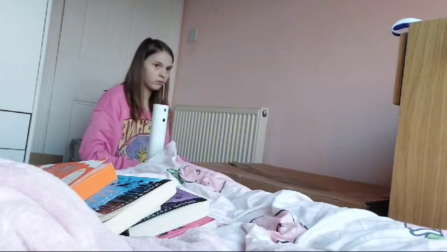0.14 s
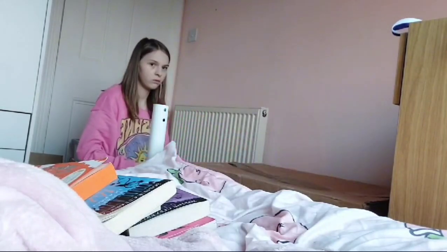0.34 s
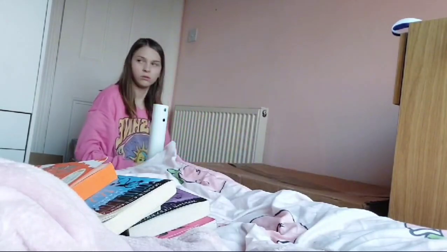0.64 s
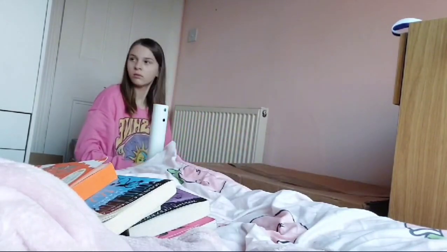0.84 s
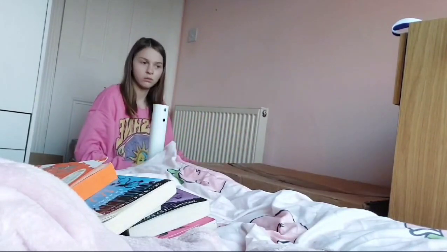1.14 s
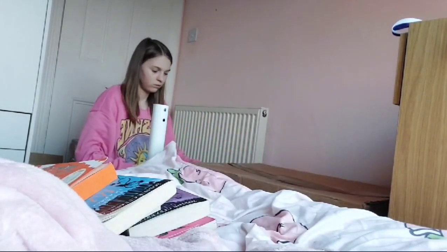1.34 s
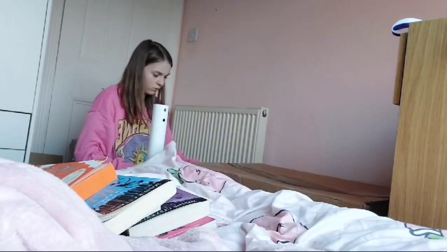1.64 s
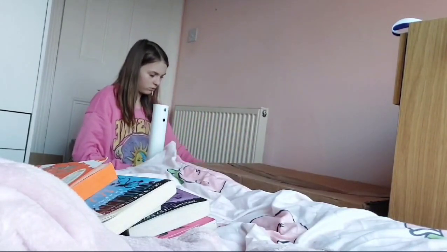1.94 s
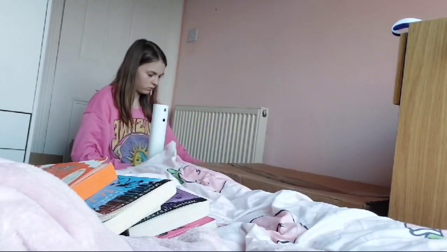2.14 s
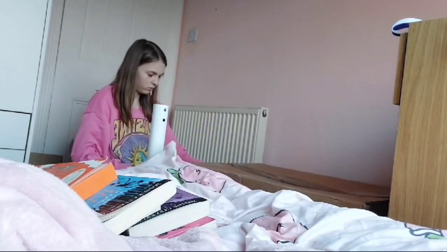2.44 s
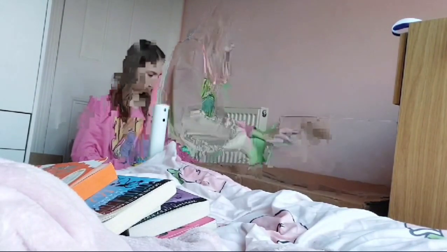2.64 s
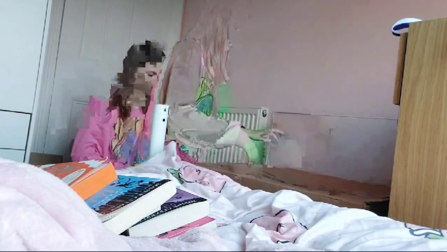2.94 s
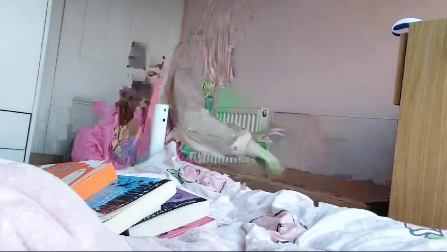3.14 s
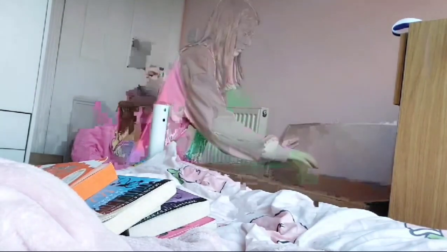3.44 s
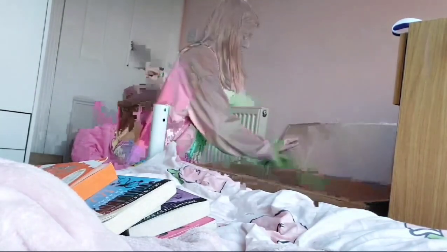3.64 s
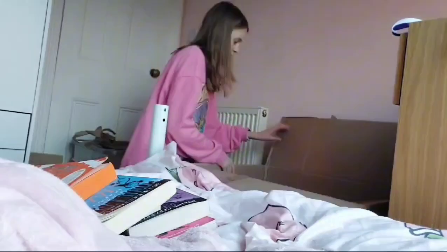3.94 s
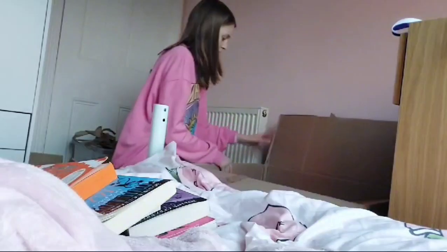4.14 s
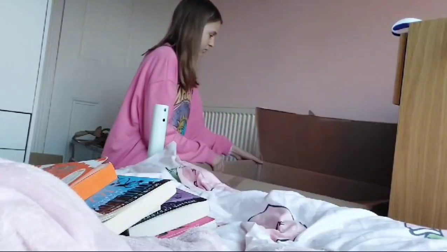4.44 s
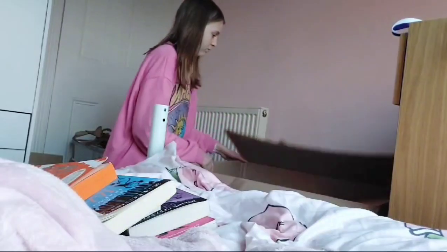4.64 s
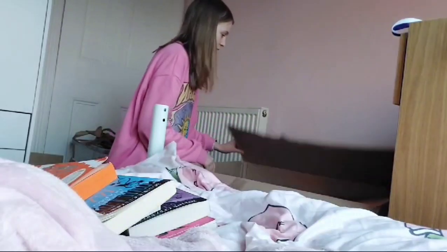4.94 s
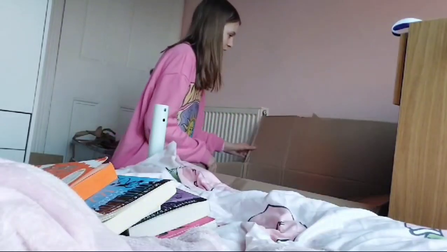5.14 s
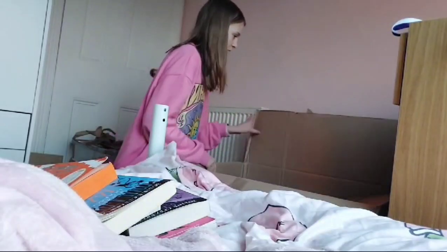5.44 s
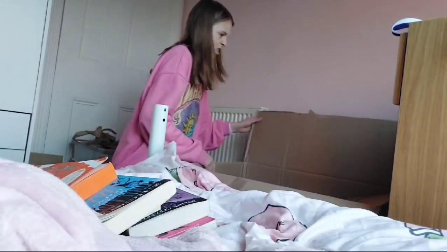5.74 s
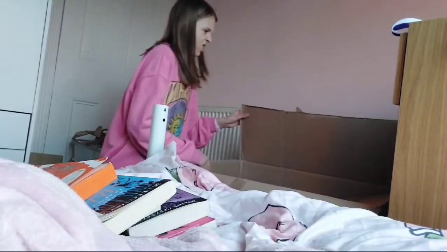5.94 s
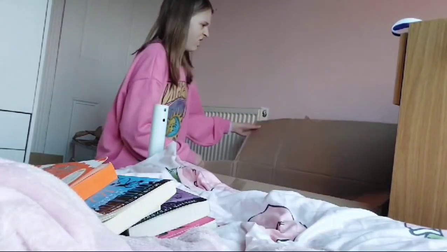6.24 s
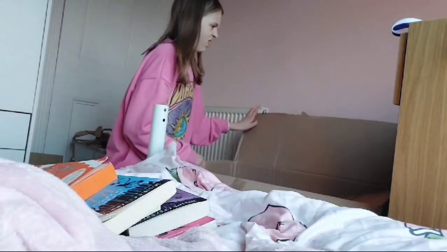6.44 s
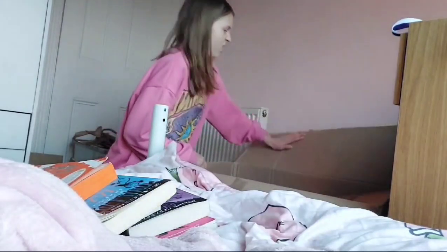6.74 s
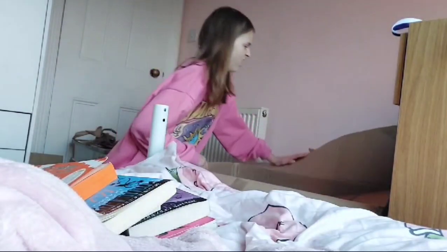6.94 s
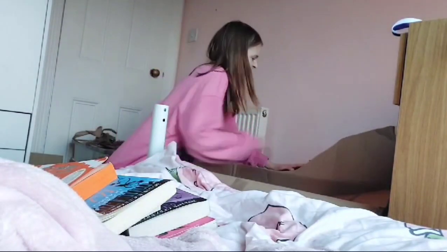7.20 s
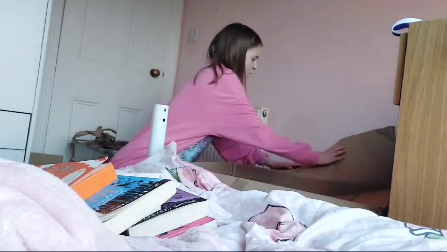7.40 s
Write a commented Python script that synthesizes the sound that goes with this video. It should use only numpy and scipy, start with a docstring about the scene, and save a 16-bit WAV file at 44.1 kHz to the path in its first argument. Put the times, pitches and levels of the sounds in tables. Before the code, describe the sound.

Close, bright paper tearing and crumpling for two seconds, a hard cut, then cardboard rubbing, rustling and dull boomy thumps in a small bedroom.

```python
"""Packing paper is ripped and crinkled at a large cardboard box in a small bedroom, with three early knocks.
At a hard cut the ripping gives way to sheets sliding over the cardboard, and soon to many knocks on its flap.
Snapping fibres are random clicks, filtered into crackle and the hollow rasp and rumble of the box;
scrapes are gliding noise bands, knocks are fading flap modes with clatter, all heard over a quiet room.
The loudest peaks flatten as they overload the microphone."""
import sys
import numpy as np
from scipy import signal
from scipy.fft import rfft, irfft, next_fast_len
from scipy.io import wavfile

SR = 44100
rng = np.random.default_rng(int(sys.argv[2]) if len(sys.argv) > 2 else 0)


def wav_out(sig):
    """Save sig, one row per channel (or a flat mono array), as 16-bit PCM at SR to the path in sys.argv[1]."""
    wavfile.write(sys.argv[1], SR, np.round(np.clip(np.atleast_2d(sig).T, -1, 1) * 32767).astype(np.int16))


N = 333837
TIME = np.arange(N) / SR
PADDED = next_fast_len(N + SR // 2)  # FFT length that leaves room for the echoes
STFT_SIZE = 512  # samples
CUT_S = 2.109  # ripping before, sliding after

# A crease or strip gives way; relative levels: [t/s, crack level/dB, jolt of the box wall/dB]
SNAPS = [(0.15, -18, -36), (0.2217, -19, -14.5), (0.268, -7, -22.5), (0.4593, -12, -18), (0.5186, -12, -13),
         (0.5686, -5, -10), (0.7606, 0.5, -4), (0.9524, -15, -28), (1.0059, 5, -8), (1.1148, -8, -4),
         (1.1912, -8, -8.5), (1.2268, -19, -15.5), (1.4651, -10.5, -46), (2.0262, -1.5, -14),
         (2.0951, -1, -11), (2.3745, -20, -27), (3.8142, -28, -33), (4.274, -22, 0), (4.8589, -30, -21),
         (5.6022, -15, -24), (5.7005, -12, -31), (6.2314, -15, -12), (6.316, -24, -24), (6.4121, -21, -40),
         (6.49, -21, -1), (6.9251, -12, -27), (6.99, -6.5, -6), (7.0202, -9.5, -25)]
# The cardboard is knocked; relative levels, nominal flap pitch:
# [t/s, boom level/dB, flap pitch f/Hz, clatter level/dB]
KNOCKS = [(0.281, -14, 111, -16.5), (0.318, -14, 125.6, -28), (0.363, -13.5, 140.5, -18),
          (2.478, -11.5, 117.5, -37.5), (3.012, -23, 131, -34), (3.302, -13, 182.6, -15.5),
          (3.317, -2.5, 144, -24), (3.345, -4.5, 145.1, -24), (3.389, -7.5, 140, -31),
          (4.104, -12, 134.5, -21), (4.159, -11.5, 140.2, -23.5), (4.276, -1, 148, -9),
          (4.626, -23, 173, -16.5), (4.703, -18.5, 115.7, -41), (4.983, -12, 134, -41),
          (5.087, -22, 185, -14.5), (5.119, 4, 127.8, -11), (5.566, -7, 138.4, -15.5),
          (5.612, -14, 146.3, -9), (5.662, -29, 143, -14.5), (5.755, -22, 138.3, -13),
          (5.892, -16, 153, -16.5), (6.007, -2.5, 112.2, -8.5), (6.178, -8.5, 109.2, -11.5),
          (6.421, -12.5, 188, -25.5), (6.587, -2, 123.7, -22.5), (6.649, -5.5, 149, -12.5),
          (6.914, -5, 128.5, -22), (7.396, 5, 132, -10.5), (7.422, -5, 117.6, -12)]
# An edge catches and scrapes, narrow bands squeak; start pitch, nominal width:
# [t/s, length/s, pitch f/Hz, width/Hz, level/dB]
SCRAPES = [(0.105, 0.021, 705, 159, -20), (0.087, 0.053, 1494, 500, -29), (0.215, 0.06, 573, 91, -12),
           (0.222, 0.061, 1450, 1100, -24.5), (0.439, 0.061, 8550, 1000, -26.5),
           (0.496, 0.022, 5190, 200, -15.5), (0.517, 0.063, 562, 120, -14.5), (1.113, 0.035, 586, 220, -21),
           (1.193, 0.072, 3730, 520, -16), (2.089, 0.019, 867, 355, -13), (2.249, 0.067, 900, 600, -24.5),
           (2.996, 0.072, 596, 260, -39), (3.297, 0.05, 470, 244, -22.5), (5.09, 0.048, 1096, 1200, -29.5),
           (5.598, 0.0066, 7900, 500, -14), (5.922, 0.1, 1916, 1700, -24.5), (5.992, 0.11, 1296, 990, -24)]


def ripping(spots, box_edge):
    """Brittle fracture: pulls on the paper break fibres in avalanches, with stick-slip at the box edge."""
    # Pulls that tear and crumple; relative levels:
    # [t/s, rise/s, fade/s, crackle level/dB, wall rasp level/dB, box rumble level/dB]
    pulls = [(0.0, 0.0013, .08, -22.5, -32, -24), (0.1, 0.0052, 0.48, -37, -28.5, -29),
             (0.2, 0.015, 0.094, -21.5, -13, -35), (0.225, 0.024, 0.16, -20.5, -33, -24),
             (0.445, 0.11, 0.047, -20, -49, -19), (0.512, 0.0073, 0.075, -12.5, -9, -42),
             (0.535, 0.061, 0.22, -10.5, -20.5, -27), (0.755, 0.0092, .17, -16.5, -21.5, -27.5),
             (0.942, 0.0083, 0.13, -21, -30.5, -24), (1.0, 0.03, .14, -14.5, -18, -19),
             (1.106, 0.012, 0.13, -13.5, -19, -25), (1.175, 0.039, 0.089, -12, -16.5, -18),
             (1.33, 0.21, 0.14, -28, -33, -39), (1.53, 0.056, 0.052, -15.5, -23, -24),
             (1.69, 0.047, 0.11, -39, -40.5, -39.5), (1.826, 0.016, 0.16, -36.5, -43, -39),
             (1.917, 0.15, 0.37, -16.5, -21, -28.5)]
    # Relative spectrum of the tearing fibres: [f/Hz, level/dB]
    crackle_spectrum = [(590, -33), (1000, -3.5), (1400, 0), (1700, 1.5), (1840, -2), (2040, 0.5),
                        (3020, -5.5), (3580, -1), (3880, -4), (5180, -0.5), (6010, -5), (7650, -2),
                        (9090, -11.5), (12000, -1), (15600, -7.5)]
    # Relative spectrum of the box wall shaken by the pulls: [f/Hz, level/dB]
    wall_spectrum = [(140, -38), (240, -1), (352, -3), (392, -7.5), (509, 3), (703, -7.5), (763, -2),
                     (1150, -11), (1500, -45), (2530, -120)]
    fibres = grains(per_s=4000, spread_db=1.0, clump_db=2.5, clumps_per_s=260)
    fibres += creases(db=-7.5, per_s=63)
    snaps = [row for row in SNAPS if row[0] < CUT_S]
    torn = paper(effort(pulls, swell=1.14), snaps, crackle_spectrum, wall_spectrum, fibres, spots,
                 crackle_db=0.14, rasp_db=-1, rumble_db=-3.0, crack_db=-11.0, jolt_db=-1.5)
    edges = scrapes([row for row in SCRAPES if row[0] < CUT_S])
    return torn + bedroom(edges, box_edge)


def sliding(spots, box_edge):
    """Dry friction: sheets pushed over cardboard excite dense small impacts, with stick-slip at the box edge."""
    # Sheets pushed over the cardboard; relative levels:
    # [t/s, rise/s, fade/s, crackle level/dB, wall rasp level/dB, box rumble level/dB]
    slides = [(2.07, 0.2, 0.32, -33.5, -34.5, -44.5), (2.215, 0.11, 0.18, -37, -22, -33),
              (2.46, 0.038, 0.097, -32, -19, -44), (2.53, 0.053, 0.2, -33.5, -31.5, -36.5),
              (3.17, 0.17, 0.12, -42, -37, -35), (3.56, 0.41, 0.3, -49, -50, -45),
              (3.8, 0.22, 0.17, -29.5, -24.5, -28), (4.1, 0.14, 0.37, -36.5, -27, -25),
              (4.255, 0.022, 0.36, -28.5, -25, -43), (4.33, 0.35, .23, -29.5, -22.5, -24),
              (4.7, 0.083, 0.029, -31, -27, -33), (4.963, 0.0062, 0.19, -39.5, -32, -34),
              (5.03, 0.085, 0.15, -33, -22.5, -17.5), (5.335, 0.11, 0.45, -36, -30, -29),
              (5.52, 0.053, 0.27, -29, -25, -16), (5.735, 0.08, 0.39, -33, -26, -39),
              (5.9, 0.09, 0.37, -32.5, -23, -23.5), (6.175, 0.022, 0.34, -31.5, -27.5, -33),
              (6.35, 0.16, 0.11, -32, -27.5, -22), (6.48, 0.027, 0.14, -21.5, -19, -25),
              (6.54, 0.049, 0.2, -22.5, -19, -16), (6.68, 0.091, 0.31, -29.5, -19.5, -26.5),
              (6.82, 0.12, 0.16, -19, -12.5, -19.5), (6.98, 0.049, 0.24, -19.5, -12.5, -23),
              (7.275, 0.025, .19, -33, -25, -35.5), (7.46, 0.08, 0.17, -28.5, -15.5, -23.5)]
    # Relative spectrum of the rubbing sheets: [f/Hz, level/dB]
    crackle_spectrum = [(590, -23.5), (1000, -1.5), (1270, -5), (1330, -1.5), (1900, -2), (2950, -7.5),
                        (3540, -5), (4070, -7), (4780, -5), (6670, -8), (7230, -4), (7740, -8),
                        (8990, -15.5), (12000, -7), (15600, -14.5)]
    # Relative spectrum of the box wall shaken by the sheets: [f/Hz, level/dB]
    wall_spectrum = [(160, -35), (240, -4.5), (300, -5.5), (370, -3), (440, -3.5), (520, -5), (620, -3.5),
                     (780, -10), (1000, -15), (1400, -21.5), (2200, -89)]
    fibres = grains(per_s=7000, spread_db=4.0, clump_db=1.26, clumps_per_s=330)
    fibres += creases(db=-12, per_s=35)
    snaps = [row for row in SNAPS if row[0] > CUT_S]
    strength = effort([*slides, *shifts()], swell=1.16)
    rubbed = paper(strength, snaps, crackle_spectrum, wall_spectrum, fibres, spots,
                   crackle_db=2.5, rasp_db=-2, rumble_db=3.5, crack_db=-5.0, jolt_db=-12)
    edges = scrapes([row for row in SCRAPES if row[0] > CUT_S])
    return rubbed + bedroom(edges, box_edge)


def paper(strength, snaps, spectrum, wall, fibres, spots, crackle_db, rasp_db, rumble_db, crack_db, jolt_db):
    """Source and resonator: fibres snap under the stroke, which also shakes the box wall and the whole box."""
    # Relative spectrum of the whole box: [f/Hz, level/dB]
    box_spectrum = [(20, -51), (35, -22.5), (50, -16), (68, 0), (88, -7.5), (125, -1), (146, -1.5),
                    (180, -13), (235, -2), (280, -15), (380, -32.5), (620, -86)]
    snap_s = 0.011  # decay time constant of a snap
    crackle, rasp, rumble = strength
    wall_grains = grains(per_s=1200, spread_db=1.5, clump_db=0.5, clumps_per_s=61)
    box_grains = grains(per_s=900, spread_db=0.95, clump_db=3.3, clumps_per_s=69)
    crackle = amp(crackle_db) * crackle * fibres
    rasp = amp(rasp_db) * rasp * wall_grains
    rumble = amp(rumble_db) * rumble * box_grains
    for start_s, db, wall_db in snaps:
        add(crackle, start_s, amp(db + crack_db) * flurry(snap_s, edge=0.99))
        add(rasp, start_s, amp(wall_db + jolt_db) * flurry(snap_s, edge=0.43))
    crackle_heard = colour(bedroom(crackle, spots), spectrum)
    rasp_heard = colour(bedroom(rasp, spots), wall)
    return crackle_heard + rasp_heard + colour(rumble, box_spectrum)


def effort(strokes, swell):
    """Power addition: strokes swell and fade, and overlapping ones add as power in crackle, rasp and rumble."""
    fade_db, fade_curve = -23, 1.18  # level after one fade time, and the bend of that fall
    power, t = np.zeros((3, N)), TIME[:SR]
    for start_s, rise_s, fade_s, *levels in strokes:
        # the higher the swell, the softer the onset
        rise = np.sin(np.pi / 2 * np.minimum(t / max(rise_s, 1e-3), 1)) ** swell
        fade_times = np.maximum(t - rise_s, 0) / max(fade_s, 1e-2)
        shape = rise * amp(fade_db * fade_times ** fade_curve)
        for layer, db in zip(power, levels):
            add(layer, start_s, (amp(db) * shape) ** 2)
    return np.sqrt(power)


def shifts():
    """Impact sets friction going: each knock starts a short rubbing stroke of the loose sheets."""
    rise_s, fade_s = 0.0074, 0.067
    crackle_db, rasp_db, rumble_db = -27.5, -7.5, -10  # relative to the knock's clatter
    return [(start_s, rise_s, fade_s, db + crackle_db, db + rasp_db, db + rumble_db)
            for start_s, _, _, db in KNOCKS]


def creases(db, per_s):
    """Sparse buckling: single creases pop out above the fine crackle."""
    return amp(db) * grains(per_s=per_s, spread_db=1.5, clump_db=0.5, clumps_per_s=30)


def grains(per_s, spread_db, clump_db, clumps_per_s):
    """Random point process: clicks of uneven size and sign, whose level wanders so that they clump."""
    size = amp(spread_db * np.minimum(rng.exponential(1, N), 4)) * rng.choice([-1, 1], N)
    struck = rng.random(N) < per_s / SR
    return evened(size * struck * amp(clump_db * drift(clumps_per_s)))


def flurry(decay_s, edge=0, edge_s=0.00056, size=12000):
    """Exponential decay: a burst of tiny impacts dies away; edge adds the sharp first break."""
    t = np.arange(size) / SR
    envelope = np.exp(-t / max(decay_s, 1e-3)) + edge * np.exp(-t / edge_s)
    return rng.choice([-1, 1], size) * envelope


def scrapes(rows):
    """Stick-slip: uneven slips modulate a carrier, a band of chatter that sags as the edge slows."""
    sag = 0.91  # end pitch over start pitch
    out = np.zeros(N)
    for start_s, length_s, hz, width_hz, db in rows:
        size = int(length_s * SR)
        noise = [1, 1j] @ rng.standard_normal((2, SR // 2))
        lowpass = signal.bessel(2, width_hz * 0.59, fs=SR, output="sos")
        slips = signal.sosfilt(lowpass, noise)[-size:]  # past the filter's onset
        carrier = np.exp(2j * np.pi * np.cumsum(np.geomspace(hz, hz * sag, size)) / SR)
        chatter = evened((slips * carrier).real)
        add(out, start_s, amp(db) * chatter * signal.windows.tukey(size, .6))
    return out


def knocks(spots):
    """Modal excitation: a knock swings the flap's low modes, heaves the box and rattles loose cardboard."""
    # Modes of the flap, relative levels: [multiple of its pitch, level/dB]
    flap_modes = [(0.83, -7), (1, 4.5), (1.76, -8), (2.2, -19)]
    # Relative spectrum of the rattling layers: [f/Hz, level/dB]
    clatter_spectrum = [(60, -34.5), (150, -1), (240, 1), (320, -1), (400, -6), (520, -7), (650, -13),
                        (850, -26.5), (1500, -28.5), (4000, -65)]
    boom_db, heave_db, clatter_db, ring_db = -9.5, -16, 2, -14
    heave_hz = 66.8  # lowest mode of the whole box, before its random rise of up to 5 %
    rise_s, hold, clatter_decay = 0.0017, 1.44, 0.63
    knock_s, shortening = 0.022, 0.12  # decay scale of a 0 dB knock; harder knocks die away sooner
    boom, clatter, t = np.zeros(N), np.zeros(N), TIME[:SR // 2]
    for start_s, db, hz, rattle_db in KNOCKS:
        decay_s = knock_s / amp(db) ** shortening
        swing = np.zeros(len(t))
        for k, (ratio, mode_db) in enumerate(flap_modes):
            mode_hz = hz * ratio * rng.uniform(0.92, 1.02)
            swing += (-1) ** k * amp(mode_db) * np.sin(2 * np.pi * mode_hz * t)
        heave = np.sin(2 * np.pi * heave_hz * rng.uniform(1.0, 1.05) * t)
        # the swing holds at first, then dies away ever faster
        fade = (1 - np.exp(-t / rise_s)) * np.exp(-(t / max(2 * decay_s, 1e-3)) ** hold)
        add(boom, start_s, amp(db) * (amp(boom_db) * swing + amp(heave_db) * heave) * fade)
        add(clatter, start_s, amp(rattle_db + clatter_db) * flurry(decay_s * clatter_decay, edge=0.99))
    ring = amp(ring_db) * bedroom(boom, spots[:1]).mean(0)  # alike at both ports
    return boom + ring + colour(bedroom(clatter, spots), clatter_spectrum)


def bedroom(x, spots):
    """Convolution with room responses: each click starts near the wandering hand and takes that spot's paths."""
    moves_per_s, reach, grip_spread = 11, 3.0, 0.9  # reach and spread are rms, in spots
    hand = reach * drift(moves_per_s)
    where = np.round(hand + grip_spread * rng.standard_normal(N)) % len(spots)
    spectrum = sum(rfft(x * (where == k), PADDED) * paths for k, paths in enumerate(spots))
    return irfft(spectrum, PADDED)[:, :N]


def spots_in_room(direct_db, tail_db, count):
    """Transfer functions: frequency responses from several spots to the two ports."""
    return [rfft(echoes(direct_db, tail_db), PADDED) for _ in range(count)]


def echoes(direct_db, tail_db, early_s=0.01, treble_hz=14000, size=14000):
    """Impulse response: direct sound, a quick scatter off box and furniture, and the reverberant tail."""
    # Reverberation time: [f/Hz, t60/s]
    reverberation = [(100, 0.43), (300, 0.34), (1000, 0.33), (4000, 0.44), (8000, 0.3), (15000, 0.2)]
    taps = rng.choice([-1., 1.], (2, size)) * (rng.random((2, size)) < .2)
    hz, t, z = two_ports(taps)
    tail = amp(tail_db - 60 * t / read(reverberation, hz)[:, None])
    early = np.exp(-t / early_s * np.hypot(1, hz[:, None] / treble_hz))  # treble dies sooner
    echo = signal.istft(z * np.hypot(early, tail), SR, nperseg=STFT_SIZE)[1]
    echo /= np.sqrt(np.sum(echo ** 2) / 2)
    # the box stands to the right, so the left port hears it up to 9 samples later
    echo[[0, 1], [rng.integers(10), 0]] += amp(direct_db)
    return echo / np.hypot(1, amp(direct_db))


def two_ports(pair):
    """Spatial coherence of a diffuse field: mixing two noises sets how alike the ports hear each frequency."""
    # Left-right correlation: [f/Hz, correlation]
    likeness = [(100, 0.45), (250, 0.68), (500, 0.91), (1000, -0.37), (2000, 0.023), (15000, -0.022)]
    hz, t, (a, b) = signal.stft(pair, SR, nperseg=STFT_SIZE)
    same = np.clip(read(likeness, hz), -1, 1)[:, None]
    mid = a * np.sqrt((1 + same) / 2)
    side = b * np.sqrt((1 - same) / 2)
    return hz, t, np.array([mid + side, mid - side])


def hush():
    """Diffuse stationary noise: filtered randomness is the quiet of the room."""
    # Relative spectrum of the quiet room: [f/Hz, level/dB]
    hush_spectrum = [(18, -44), (30, -2), (130, 18), (197, 8), (263, 12.5), (342, 3.5), (468, 2.5),
                     (1270, -13), (4560, -23), (7500, -13.5), (15600, -25.5)]
    z = two_ports(rng.standard_normal((2, N)))[2]
    noise = signal.istft(z, SR, nperseg=STFT_SIZE)[1]
    return amp(-45.0) * evened(colour(noise, hush_spectrum))


def colour(x, spectrum, size=4096):
    """Minimum-phase filtering: a causal filter with this spectrum; white noise keeps its power."""
    gain = evened(amp(read(spectrum, abs(np.fft.fftfreq(size, 1 / SR)))))
    log_gain = np.log(np.maximum(gain, 1e-5))
    # the Hilbert transform of the log gain gives the phase
    ring = np.fft.ifft(np.exp(np.conj(signal.hilbert(log_gain)))).real
    return signal.oaconvolve(np.atleast_2d(x), ring[None], axes=1)[:, :N]


def drift(per_s):
    """Slow random modulation: straight lines between random knots, rms 1."""
    knots = rng.standard_normal(N)
    return evened(np.interp(TIME * per_s, np.arange(N), knots))


def amp(db):
    """Logarithmic level: decibels to amplitude gain."""
    return 10 ** (np.asarray(db) / 20)


def evened(x):
    """Power normalisation: scales to rms 1."""
    return x / np.sqrt(np.mean(x ** 2) + 1e-20)


def read(points, hz):
    """Logarithmic frequency scale: interpolates a table along it."""
    f, value = np.transpose(points)
    return np.interp(np.log(hz + 1), np.log(f + 1), value)


def add(mix, start_s, sound):
    """Superposition: adds a sound into the mix at start_s."""
    part = mix[max(round(start_s * SR), 0):][:len(sound)]
    part += sound[:len(part)]


def scene():
    """Superposition: ripping up to the cut or sliding after it, plus knocks and the quiet room."""
    spots = spots_in_room(direct_db=-5.5, tail_db=-10.0, count=14)
    box_edge = spots_in_room(direct_db=-3.0, tail_db=-10.5, count=1)
    strokes = np.where(TIME < CUT_S, ripping(spots, box_edge), sliding(spots, box_edge))
    return strokes + knocks(spots) + hush()


def record(dry):
    """Transducer response and saturation: each port has its colour, loud peaks flatten, then the band limit."""
    # Colour of the two microphone ports: [f/Hz, left minus right level/dB]
    port_colour = [(120, 3), (260, -3), (600, -7.5), (850, -4), (1100, 1), (1800, -2), (3000, 3),
                   (6300, 1.5), (8000, -3), (9500, -5.5), (11500, -13), (13000, -6), (16000, -2)]
    tilt = amp(read(port_colour, np.fft.rfftfreq(N, 1 / SR)))
    # the two gains keep a constant summed power
    ports = np.array([tilt, np.ones_like(tilt)]) * np.sqrt(2 / (1 + tilt ** 2))
    heard = irfft(rfft(dry) * ports, N)
    limited = heard / (1 + heard ** 6) ** (1 / 6)
    band_limit = signal.firwin(511, 15800, window=("kaiser", 9), fs=SR)  # cutoff in Hz
    return signal.oaconvolve(limited, band_limit[None], "same")


dry = scene()
out = record(dry)
wav_out(out)
```